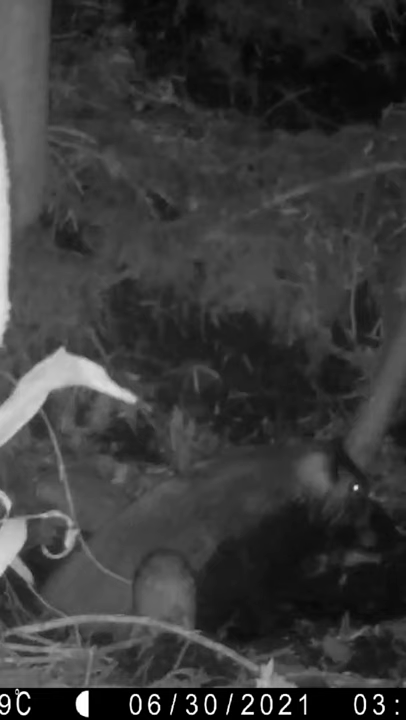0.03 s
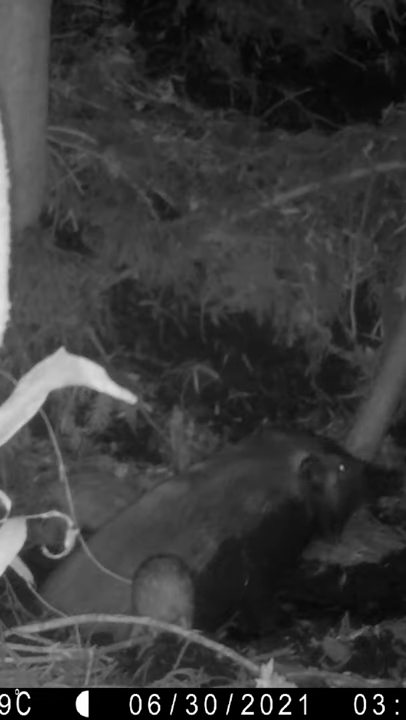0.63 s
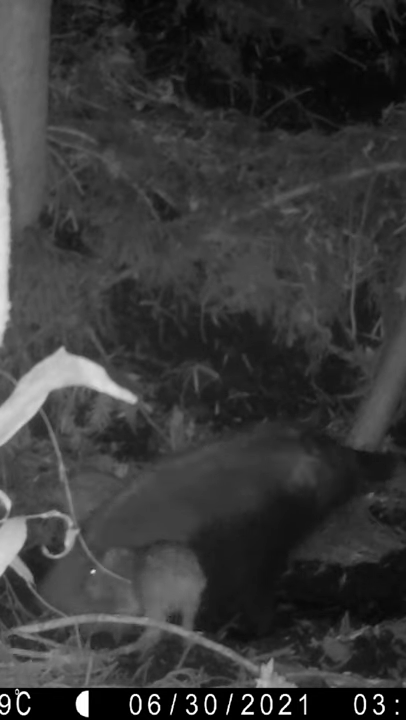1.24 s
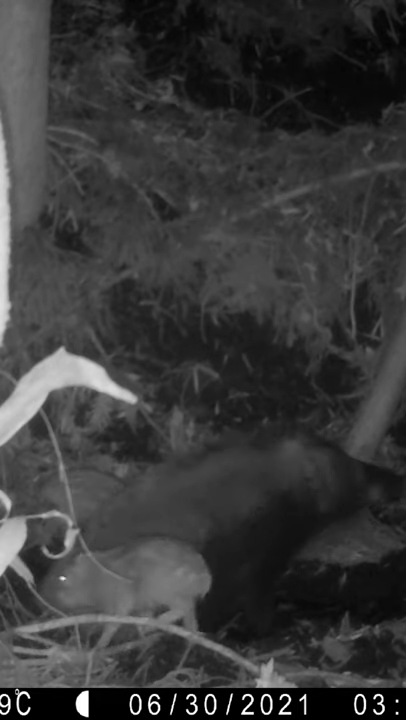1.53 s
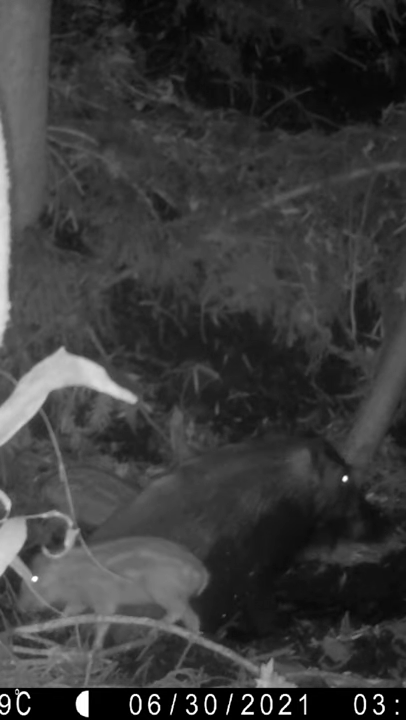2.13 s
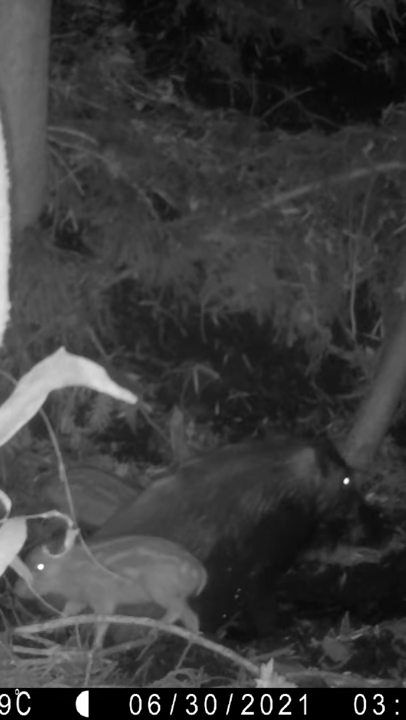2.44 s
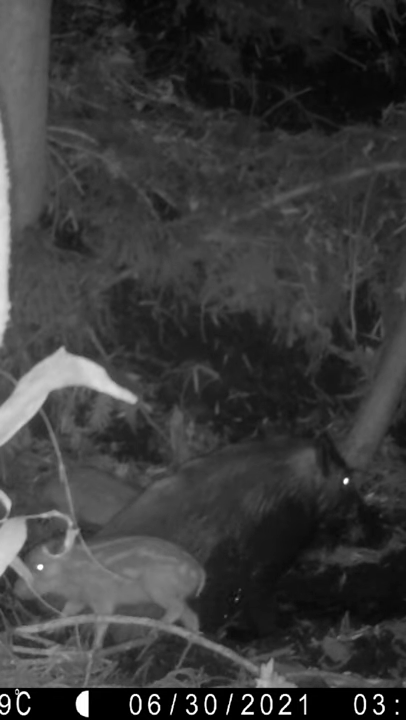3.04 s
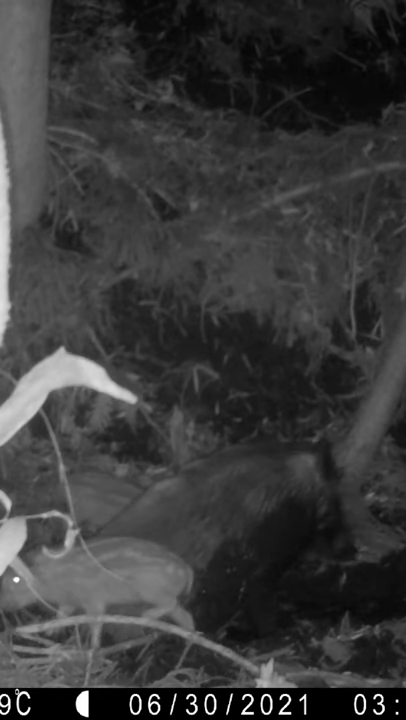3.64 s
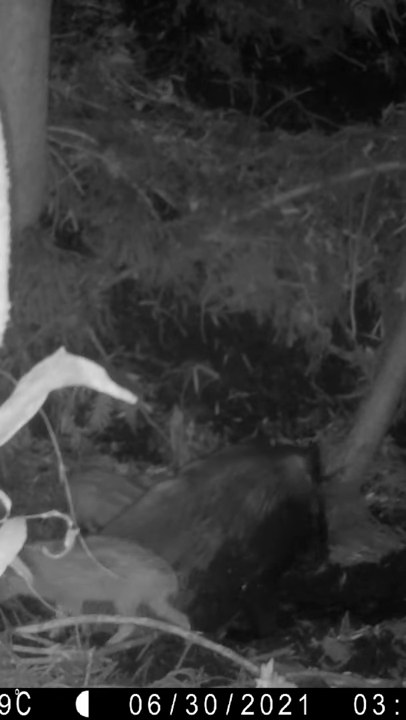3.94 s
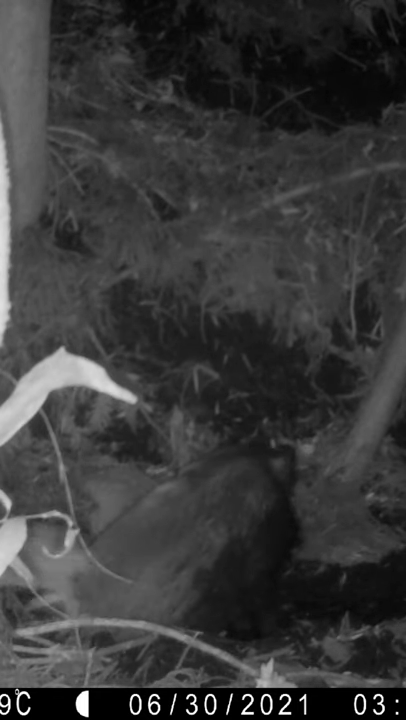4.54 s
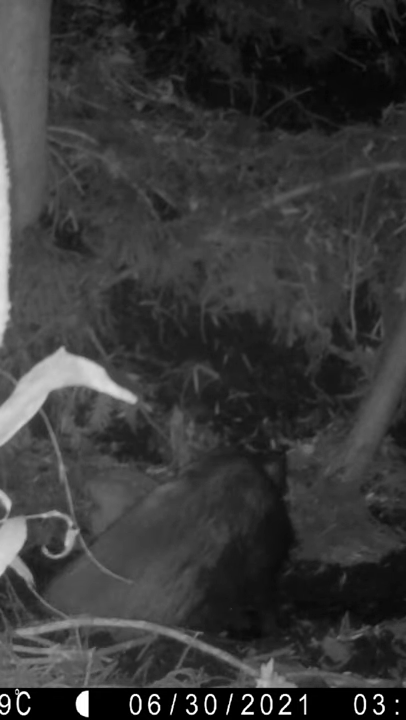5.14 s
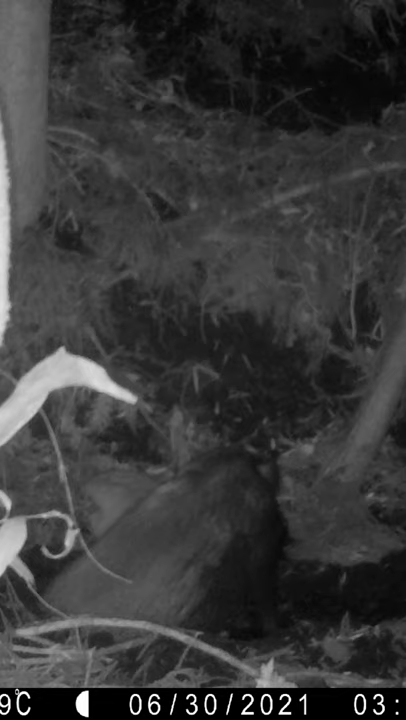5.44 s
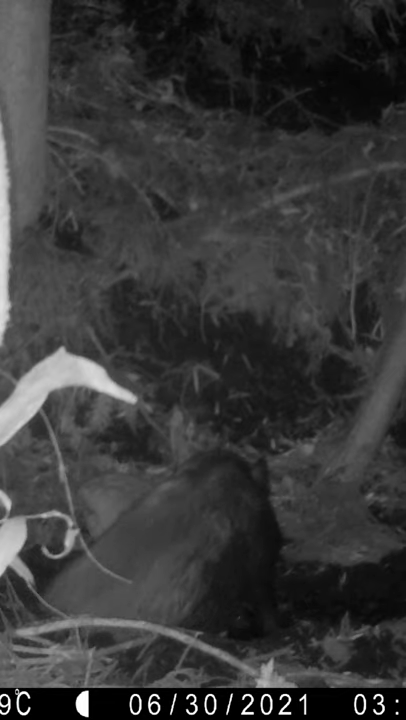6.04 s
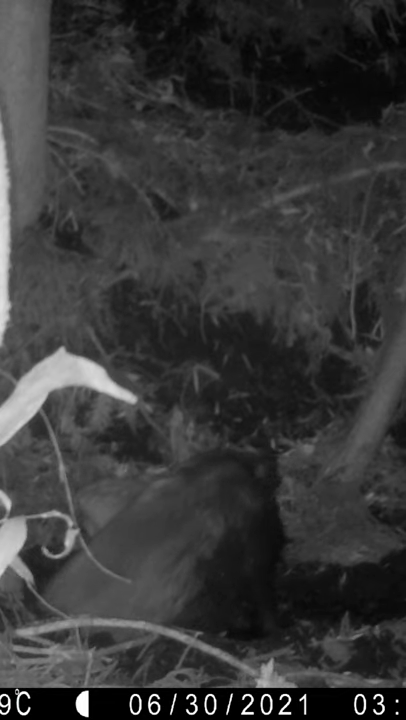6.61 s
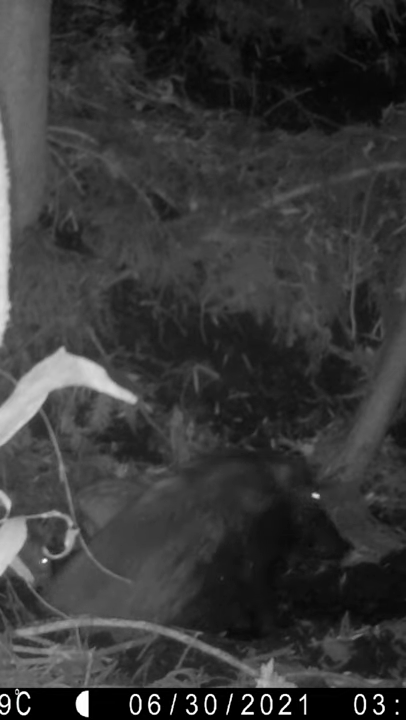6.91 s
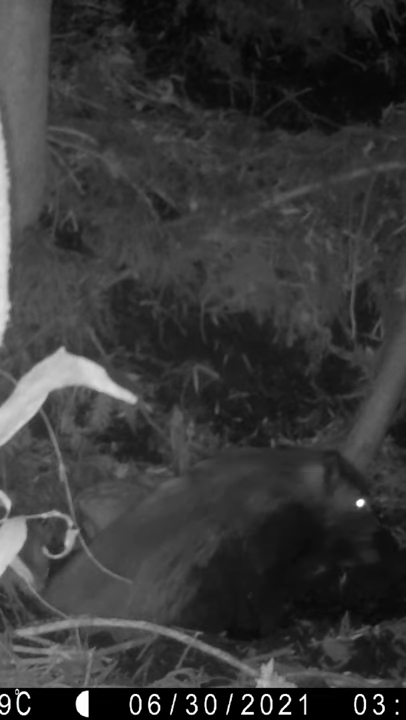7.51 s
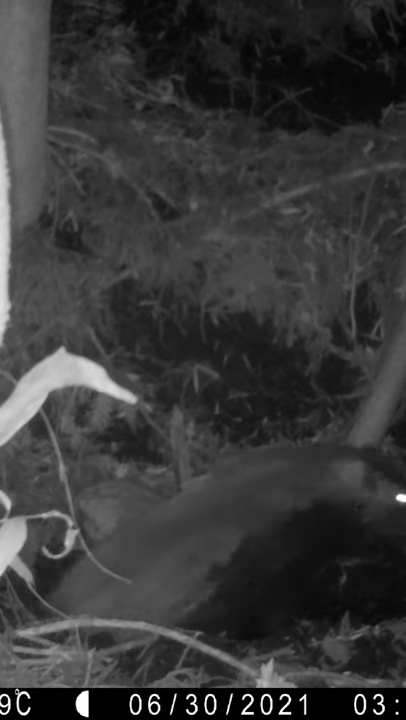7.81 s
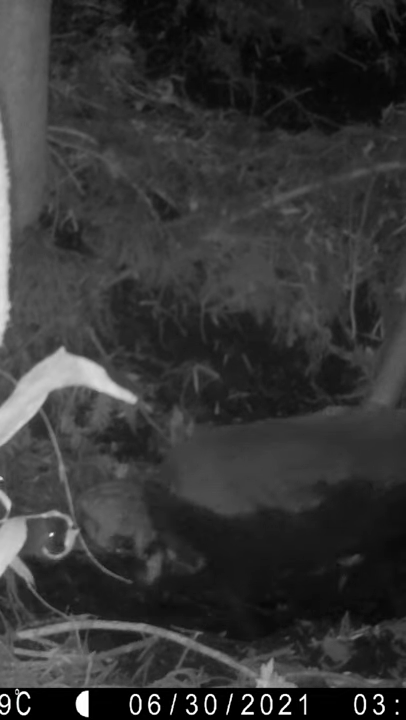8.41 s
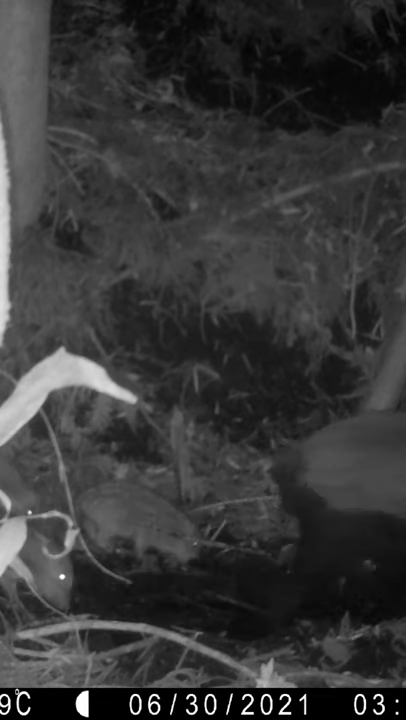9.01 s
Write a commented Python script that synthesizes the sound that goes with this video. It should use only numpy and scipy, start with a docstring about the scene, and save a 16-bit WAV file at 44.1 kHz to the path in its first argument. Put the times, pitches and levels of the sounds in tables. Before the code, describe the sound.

Two bursts of wet clicks, pops and crackling leaf litter as a boar moves in mud, over a faint steady hiss.

```python
"""Wild boar in a night wallow

Near a trail camera in the forest, a boar shakes its wet head, shifts quietly, heaves up and walks off.
Wet slaps and legs pulling free of the mud click, air pockets pop, and stirred litter crackles.
The camera adds hiss, and its switching current makes a fine buzz and a thin whine."""
import sys
import numpy as np
from scipy import signal
from scipy.io import wavfile
from scipy.ndimage import uniform_filter1d

SR = 44100
rng = np.random.default_rng(int(sys.argv[2]) if len(sys.argv) > 2 else 0)


def master(y):
    """Save y as 16-bit WAV."""
    cut = np.clip(np.atleast_2d(y).T, -1, 1)
    pcm = np.round(cut * 32767)  # scale
    wavfile.write(sys.argv[1], SR, pcm.astype(np.int16))


N = 408366
TIME = np.arange(N) / SR


def gain_of(db):
    return 10 ** (np.asarray(db) / 20)


def unit_rms(x):
    return x / np.sqrt(np.mean(x ** 2) + 1e-20)


def add(mix, start_s, sound):
    part = mix[max(round(start_s * SR), 0):][:len(sound)]
    part += sound[:len(part)]


def colour(x, spectrum, size=4096):
    """Minimum-phase filter through points (frequency [Hz], gain [dB])."""
    hz, db = np.transpose(spectrum)
    bin_hz = abs(np.fft.fftfreq(size, 1 / SR)) + 1
    log_gain = np.log(gain_of(np.interp(np.log(bin_hz), np.log(hz), db)))
    taps = np.fft.ifft(np.exp(np.conj(signal.hilbert(log_gain)))).real
    return signal.oaconvolve(x, taps[:size // 2])[:len(x)]


def band(x, hz, width_hz):
    """Double resonance, unit RMS."""
    pole = np.exp((2j * np.pi * hz - np.pi * width_hz) / SR)
    return unit_rms(signal.lfilter([1], np.poly([pole, pole]), x).real)


def grains(count, per_s, spread_db):
    """Random impulses of uneven size, unit RMS."""
    chance, size, side = rng.random((3, count))
    size_db = spread_db * np.minimum(-np.log(1 - size), 4)
    return unit_rms((chance < per_s / SR) * np.sign(side - .5) * gain_of(size_db))


def ping(t, hz, rise_s):
    """Damped ring, envelope peaking at rise_s."""
    age = t / rise_s
    return age * np.exp(1 - age) * np.sin(2 * np.pi * hz * t)


# Camera hiss and switching tick spectra: (frequency [Hz], gain [dB])
HISS_SPECTRUM = [(25, -16.5), (60, -14), (120, -8), (250, -3), (400, -1.35), (750, 0), (1500, -3),
                 (2500, -8.5), (3900, -17.5), (4500, -25), (6000, -35.5), (7500, -42), (15500, -39)]
TICK_SPECTRUM = [(50, -27), (300, -6), (600, 0.5), (1200, 5), (2000, 2.5), (3000, 0), (4000, -7.5),
                 (5000, -11.5), (7000, -25), (16000, -89)]
def camera_noise(frame_hz=29.7566, whine_hz=7796.229, hiss_db=-53, tick_db=-63, whine_db=-66.5):
    """Hiss, plus a current switching twice a frame: each switch ticks and flips a slightly rough whine."""
    frame_phase = 2 * np.pi * frame_hz * (TIME - .00632)
    switch = np.clip(np.sin(frame_phase) * SR / (2 * np.pi * frame_hz), -1, 1)
    ticks = unit_rms(colour(np.diff(switch, prepend=switch[0]), TICK_SPECTRUM))
    whine_phase = frame_phase * whine_hz / frame_hz
    roughness = .061 * band(rng.standard_normal(N), whine_hz, width_hz=440)
    whine = (switch + .22) * np.sin(whine_phase) + roughness
    overtone = gain_of(-90) * np.sin(2 * whine_phase)
    hiss = unit_rms(colour(rng.standard_normal(N), HISS_SPECTRUM))
    return gain_of(hiss_db) * hiss + gain_of(tick_db) * ticks + gain_of(whine_db) * whine + overtone


# Leaf rustles: (centre time [s], level [dB], half length [s])
LEAF_RUSTLES = [(0.546, -56, .0061), (1.885, -61, .02), (2.22, -59, .015), (2.484, -59.5, 0.024),
                (2.883, -59, .008), (3.685, -61, .08), (4.106, -64, 0.028), (4.23, -63, .012),
                (4.61, -65, .04), (5.209, -60.5, 0.069), (7.69, -61, 0.041)]
def rustles():
    """Soft, grainy brushes through dry leaves."""
    out = np.zeros(N)
    for centre_s, db, half_s in LEAF_RUSTLES:
        t = np.arange(-2 * half_s, 2 * half_s, 1 / SR)
        leaves = band(grains(len(t), per_s=700, spread_db=3.5), hz=3600, width_hz=1500)
        add(out, centre_s + t[0], gain_of(db) * np.exp(-(t / half_s) ** 2) * leaves)
    return out


# Shake slaps, ticks at rest, legs leaving the mud: (time [s], level [dB], pitch [Hz], spatter [dB re click])
WET_CLICKS = [(0.947, -34.5, 2400, -8), (0.985, -34, 3670, -13), (1.0375, -33.5, 1800, -7),
              (1.0583, -25.5, 3100, -12), (1.0713, -19.5, 2040, -12.5), (1.1246, -32, 1400, -8),
              (1.1802, -27, 3130, -6.5), (1.3007, -23.5, 3200, -9.5), (1.357, -30, 2300, -10),
              (1.4205, -26.5, 3080, -6), (1.4243, -22.5, 2800, -19), (1.5375, -26, 3120, -8),
              (1.541, -14, 2980, -15), (1.5592, -31.5, 3300, -3), (1.6574, -29, 2780, -11),
              (1.6784, -31.5, 4000, -1.5), (2.164, -42, 3750, -11), (2.494, -45, 3600, -7),
              (4.8135, -41, 3550, -6), (6.141, -42.5, 3300, -10), (7.8979, -34, 2730, -3),
              (7.934, -35.5, 2200, -7), (8.0122, -22, 2680, -10), (8.0305, -32, 3700, -6.5),
              (8.146, -33, 2710, -5), (8.178, -21, 3580, -9), (8.3552, -32, 2780, -4),
              (8.3638, -23, 3250, -7), (8.3671, -23.5, 3500, -7.5), (8.4787, -34, 2200, -6),
              (8.974, -30, 2530, -7.5), (8.979, -27.5, 2500, -16), (9.0251, -34.5, 2000, -7.5),
              (9.059, -33.5, 3680, -15)]
def wet_clicks(snap_db=-12, snap_s=.00014, rise_cycles=.66, spatter_s=.0051, trim_db=-.2):
    """Each click snaps, rings for a few cycles and trails a spatter of droplets and crumbs."""
    out, t = np.zeros(N), TIME[:4096]
    fade = np.exp(-t / spatter_s) * (1 - np.exp(-t / .0008))
    for start_s, db, hz, spatter_db in WET_CLICKS:
        snap = gain_of(snap_db) * np.exp(-t / snap_s) * np.cos(4 * np.pi * hz * t)  # octave up
        ring = ping(t, hz, rise_cycles / hz)
        spatter = band(grains(len(t), per_s=5000, spread_db=3), hz, width_hz=2400) * fade
        add(out, start_s, gain_of(db) * (snap + ring + gain_of(spatter_db) * spatter))
    return gain_of(trim_db) * out


def effort(start_s, hold_s, attack_s, release_s=.027):
    """Movement envelope: builds up to start_s, holds, dies away."""
    build = np.minimum(TIME - start_s, 0) / attack_s
    decay = np.maximum(TIME - start_s - hold_s, 0) / release_s
    return np.exp(build - decay)


def head_shake(first_swing_s=1.072, swing_s=.0605):
    """Litter and mud gains: every swing squelches, every second one flings litter."""
    swings = (TIME - first_swing_s) / swing_s
    litter_db = -55 + 2 * np.cos(np.pi * swings)
    mud_db = -53 + 2 * np.cos(2 * np.pi * swings)
    return gain_of([litter_db, mud_db]) * effort(start_s=1.01, hold_s=.672, attack_s=.073)


def bubbles(low_hz=1300, high_hz=4400, sizes=24, rise_cycles=2.3):
    """Tiny bubbles, each size popping at random."""
    out = np.zeros(N)
    for hz in np.geomspace(low_hz, high_hz, sizes):
        pops = grains(N, per_s=16, spread_db=0)
        out += signal.oaconvolve(pops, ping(TIME[:1024], hz, rise_cycles / hz))[:N]
    return unit_rms(out)


# Grain spectra: (frequency [Hz], gain [dB])
LITTER_SPECTRUM = [(500, -22), (1500, -13), (2600, 1.5), (3300, 1.5), (4100, 1), (6000, -14), (16000, -21)]
MUD_SPECTRUM = [(100, -18), (300, -1), (750, -10), (1150, 1.5), (1600, -1.5), (2200, 3.5), (3200, -15),
                (8000, -23)]
# Settling, heaving up, footfalls: (time [s], hold [s], litter level [dB], mud level [dB])
WEIGHT_SHIFTS = [(1.72, .19, -64, -75), (7.81, .4, -62, -66), (7.875, .02, -57, -58),
                 (8.02, 0.16, -55, -62), (8.385, 0.027, -49, -64), (8.475, .02, -66, -54),
                 (8.52, 0.61, -62.5, -70), (8.97, 0.054, -60, -63)]
def stirred_ground(bubble_db=-5):
    """Grains of litter and bubbly mud, stirred by the shake and each shift of weight."""
    power = head_shake() ** 2
    for start_s, hold_s, litter_db, mud_db in WEIGHT_SHIFTS:
        power += np.outer(gain_of([litter_db, mud_db]), effort(start_s, hold_s, attack_s=.041)) ** 2
    litter_gain, mud_gain = np.sqrt(power)
    litter = unit_rms(colour(grains(N, per_s=1800, spread_db=4), LITTER_SPECTRUM))
    mud = unit_rms(colour(grains(N, per_s=1300, spread_db=4.5), MUD_SPECTRUM))
    mud += gain_of(bubble_db) * bubbles()
    return litter * litter_gain + mud * mud_gain


# Air pockets popping in the mud, and at 6.24-6.28 s a few faint pitched ticks: (time [s], level [dB], pitch
# [Hz])
AIR_POCKETS = [(1.0974, -32.5, 1170), (1.1087, -34, 1090), (1.116, -32.5, 2890), (1.235, -30, 1120),
               (1.236, -34.5, 1540), (1.2432, -32.5, 1150), (1.244, -34.5, 2180), (1.355, -34, 1250),
               (1.3643, -39, 1290), (1.414, -35, 310), (1.443, -33.5, 2670), (1.4775, -37.5, 1260),
               (1.556, -34.5, 1114), (1.5938, -39.5, 1120), (1.75, -41.5, 3530), (6.24, -52, 3380),
               (6.258, -47.5, 3300), (6.281, -50, 3300), (7.879, -39.5, 1620), (7.899, -39, 2800),
               (7.956, -41, 2500), (8.0703, -39.5, 4070), (8.11, -38.5, 2830), (8.148, -39.5, 1600),
               (8.289, -35, 2770), (8.301, -37.5, 2120), (8.347, -38, 1690), (8.3525, -36, 2090),
               (8.47, -38, 4170), (8.502, -40.5, 3150), (9.065, -40, 3970), (9.1334, -39.5, 2940),
               (9.2, -42, 3140)]
def air_pockets(glide_per_s=.73, wobble_depth=.068, froth_db=-9, trim_db=-2):
    """Each pocket rings at an unsteady pitch that rises as it opens, while its wet skin tears."""
    out, t = np.zeros(N), TIME[:4096]
    for start_s, db, hz in AIR_POCKETS:
        wobble = unit_rms(uniform_filter1d(rng.standard_normal(len(t)), size=70))
        pitch_ratio = 1 + glide_per_s * t + wobble_depth * wobble
        rise_s = .00225 * (2000 / hz) ** .36  # bigger pockets swell more slowly
        ring = ping(np.cumsum(pitch_ratio) / SR, hz, rise_s)
        tearing = band(grains(len(t), per_s=3000, spread_db=1), (hz + 2200) / 2, width_hz=2200)
        froth = tearing * abs(signal.hilbert(ring))
        add(out, start_s, gain_of(db) * (ring + gain_of(froth_db) * froth))
    return gain_of(trim_db) * out


def forest(x, t60_s=.37, predelay_s=.003, wet_db=-8):
    """Sparse echoes from ground and trunks."""
    t = TIME[:SR // 2]
    echoes = grains(len(t), per_s=2500, spread_db=2) * gain_of(-60 * t / t60_s) * (t > predelay_s)
    return x + gain_of(wet_db) * signal.oaconvolve(x, echoes / np.linalg.norm(echoes))[:N]


# Microphone response: (frequency [Hz], gain [dB])
MIC_RESPONSE = [(60, -28), (500, -3), (1100, 0.5), (3000, -2), (4100, -1), (4600, -10), (5200, -14),
                (6500, -23.5), (9000, -23), (16000, -28)]
def scene():
    """The boar among trees through a small, dull microphone, plus camera noise; mono."""
    boar = forest(wet_clicks() + air_pockets() + stirred_ground() + rustles())
    return (colour(boar, MIC_RESPONSE) + camera_noise())[None]


def record(dry):
    """The camera's sound input wakes a moment late and is band-limited."""
    wake_s, cutoff_hz = .2, 15750
    lowpass = signal.firwin(1023, cutoff_hz, window=("kaiser", 9), fs=SR)
    return signal.oaconvolve(dry * (TIME >= wake_s), lowpass[None], "same")


dry = scene()
out = record(dry)
master(out)
```